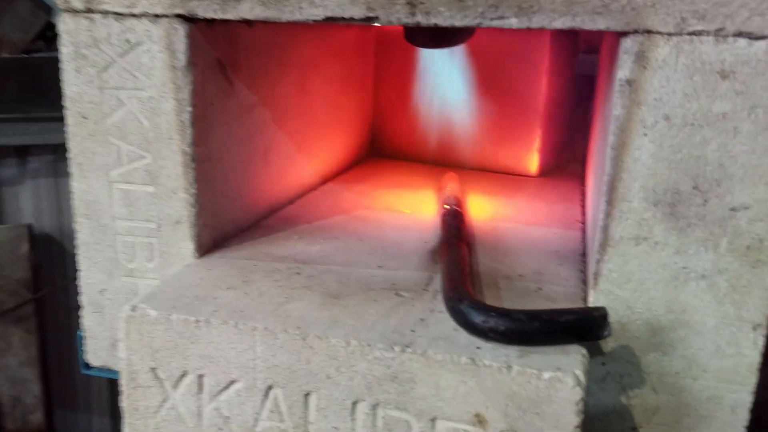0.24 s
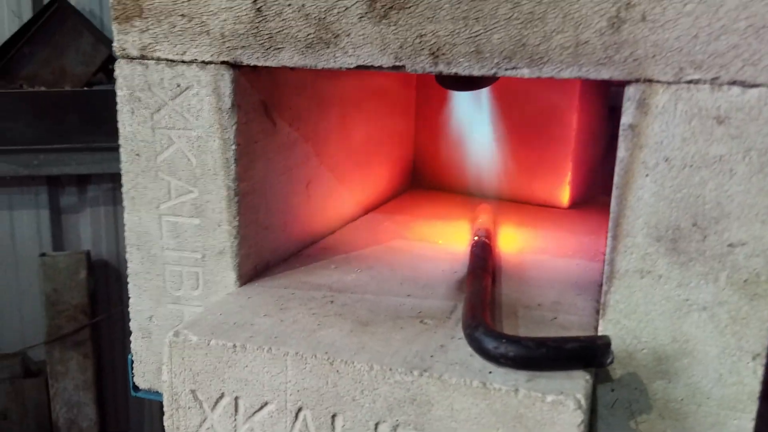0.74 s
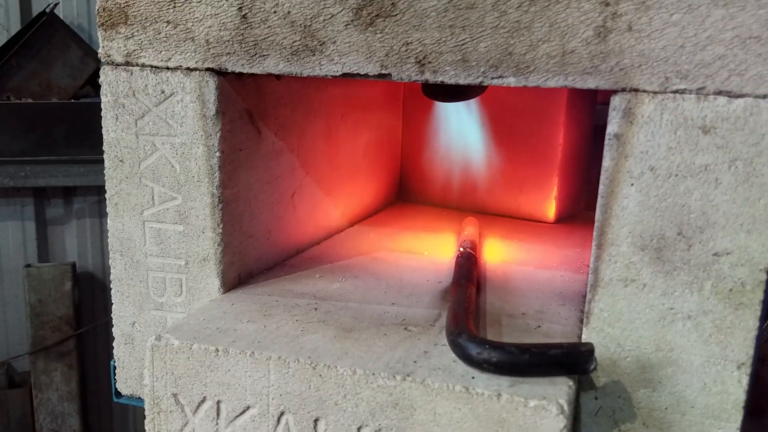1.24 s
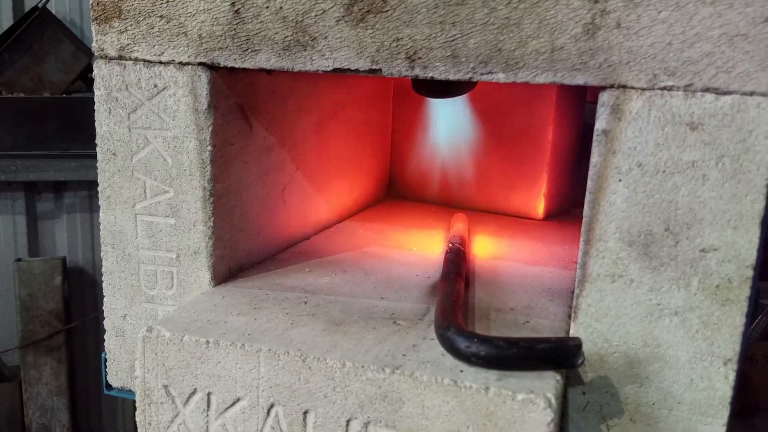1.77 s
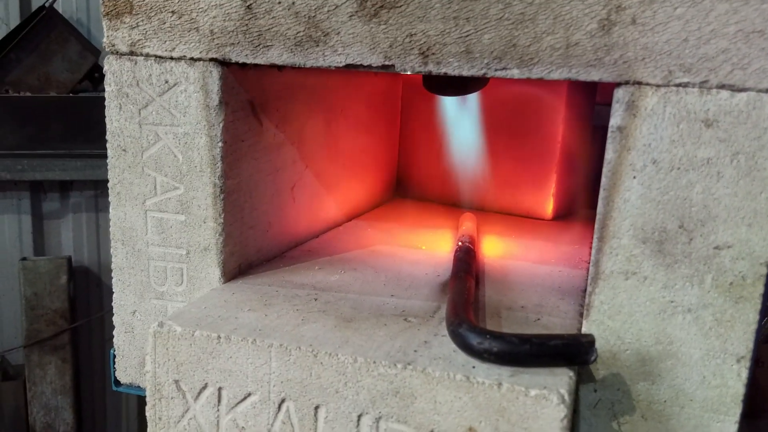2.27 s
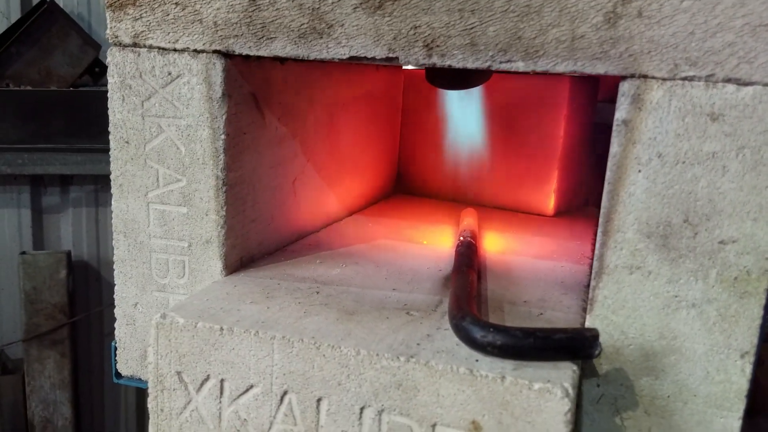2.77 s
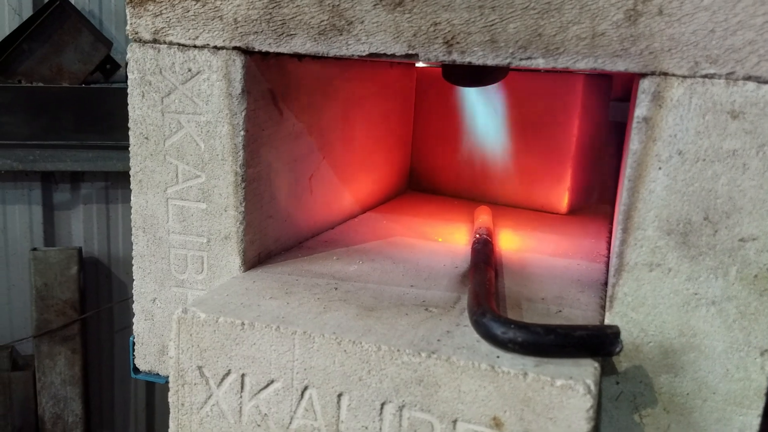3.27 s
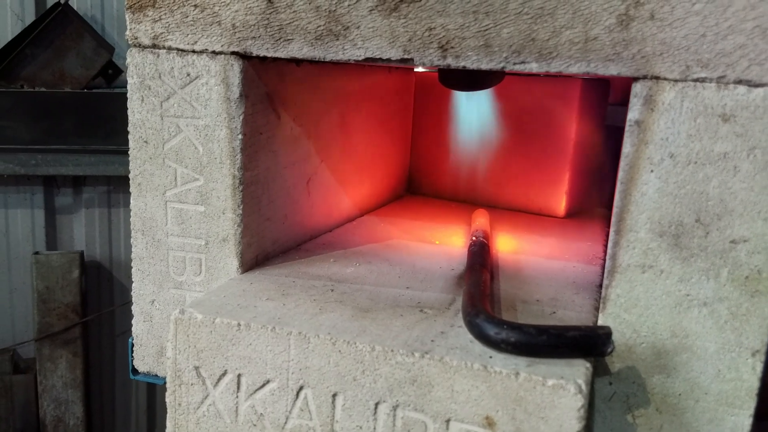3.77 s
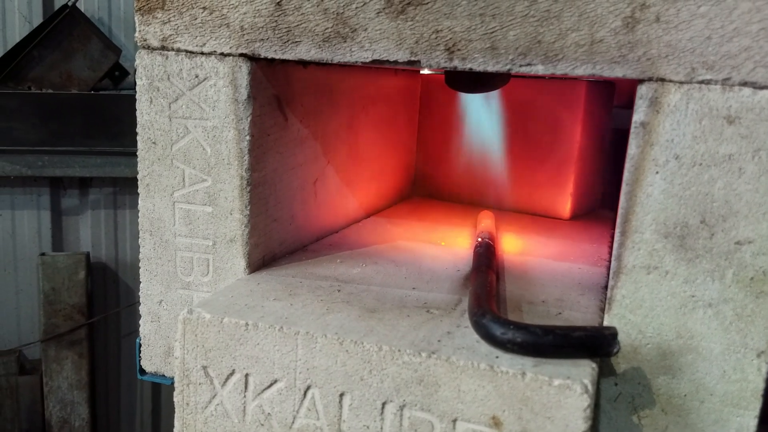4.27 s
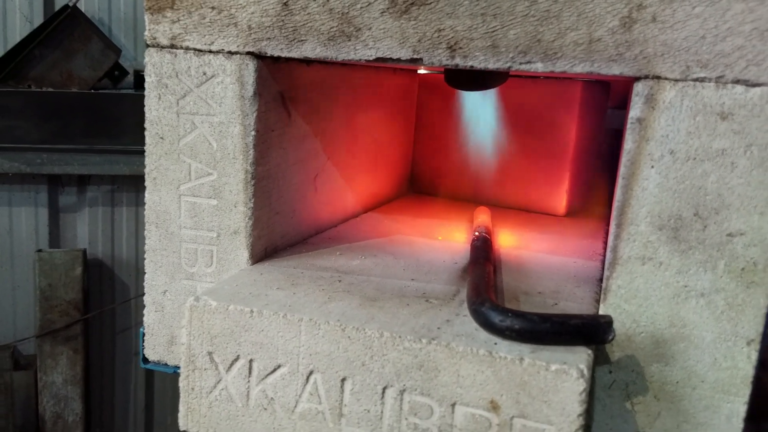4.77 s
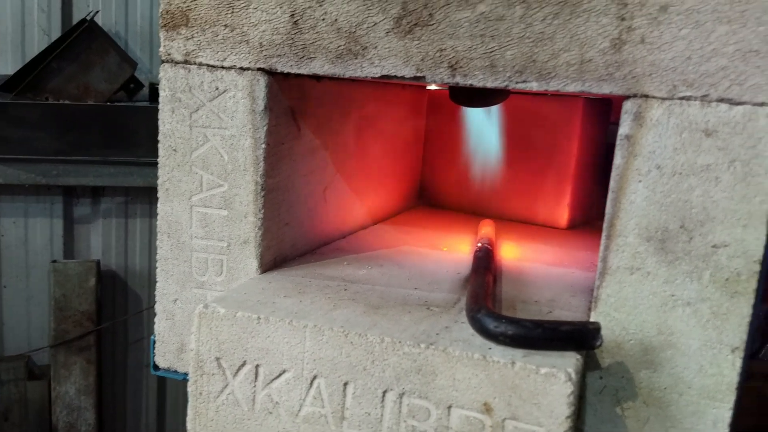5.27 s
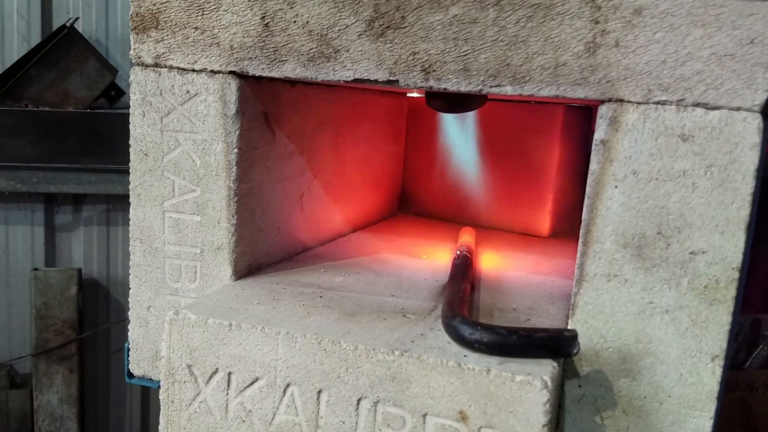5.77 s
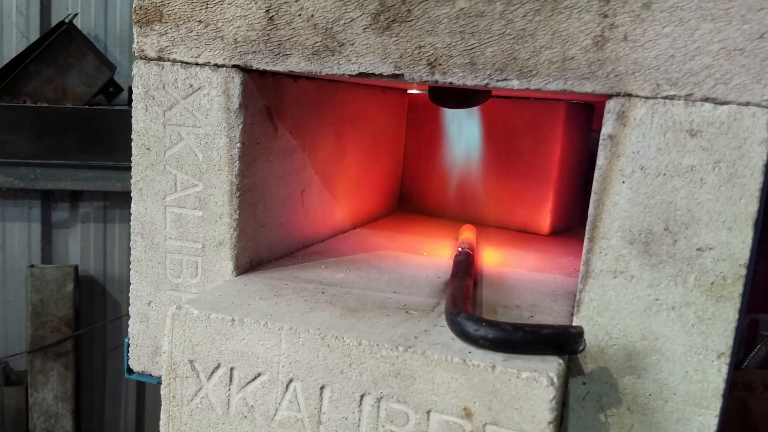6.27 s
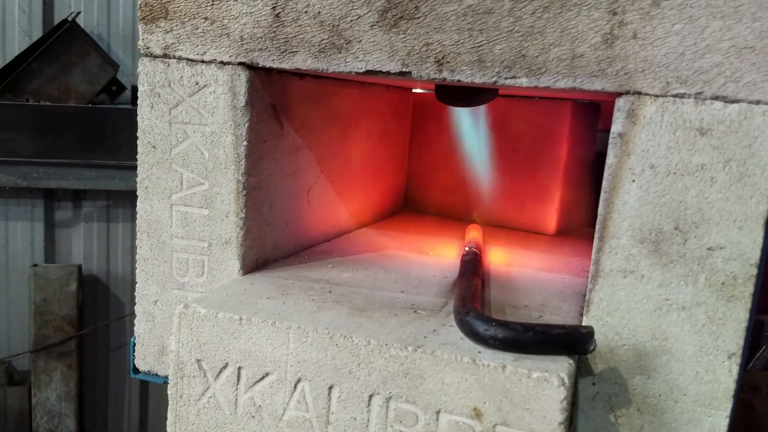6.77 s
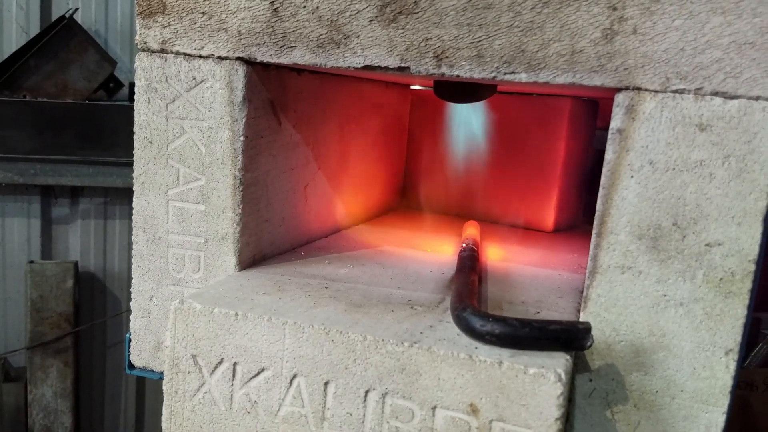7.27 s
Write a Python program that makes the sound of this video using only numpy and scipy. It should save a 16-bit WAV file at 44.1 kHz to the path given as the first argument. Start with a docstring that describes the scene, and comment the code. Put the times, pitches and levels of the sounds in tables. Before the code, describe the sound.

A propane forge burner makes a low, fluttering roar with a faint hiss, gradually getting quieter, with a few soft scuffs nearby.

```python
"""A low, fluttering roar is heard first: a turbulent propane flame driving the resonances of a small
firebrick forge. The flame front adds a soft rasp; the gas jet hisses and sings faintly in the burner
tube. All of these weaken as the gas is slowly turned down. Someone beside the forge shifts about,
making a few quiet scuffs, ticks and, near the end, stick-slip squeaks."""
import sys
import numpy as np
from scipy import signal
from scipy.fft import rfft, irfft
from scipy.io import wavfile
from scipy.ndimage import uniform_filter1d

SR = 44100
rng = np.random.default_rng(int(sys.argv[2]) if len(sys.argv) > 2 else 0)


def generate_wav(signal):
    """Clip the signal to [-1, 1] and save it as 16-bit WAV at the path in sys.argv[1]."""
    frames = np.transpose(np.atleast_2d(signal))
    scaled = np.clip(frames, -1, 1) * 32767
    pcm = np.round(scaled).astype(np.int16)
    wavfile.write(sys.argv[1], SR, pcm)


N = 331632
TIME = np.arange(N) / SR
HZ = np.maximum(np.fft.rfftfreq(N, 1 / SR), 1)

# Spectra of the noise sources. Each row: frequency in Hz, relative spectral density in dB.
RUMBLE_SPECTRUM = [(20, -43), (30, -34), (45, -16.5), (65, -9.5), (90, -3.5), (125, -4), (170, -6.5),
                   (235, -7), (285, -11.5), (325, -7), (415, -10), (440, -23), (600, -27), (900, -66.5)]
EDDY_SPECTRUM = [(150, -15), (300, -8), (420, 1), (520, 1.5), (600, -7.5), (700, -9.5), (800, -22),
                 (950, -37.5), (1400, -73)]
RASP_SPECTRUM = [(500, -3.5), (850, -5.5), (970, -7), (1100, 1.5), (1330, 2), (1850, -0.5), (2350, -9.5),
                 (3000, -18), (4800, -20), (6000, -22), (9000, -55)]
JET_SPECTRUM = [(1000, -8), (2500, -4), (4000, -6), (5700, -12), (6300, -5.5), (6950, -8.5), (7500, -6),
                (9600, -5.5), (10700, -1), (11300, -2.5), (12500, 2), (14500, 1.3), (16000, 1.5)]
SHOP_SPECTRUM = [(15, -26), (30, -17), (50, 1.5), (100, -1.5), (300, -7.5), (700, -18.5), (970, -30.5),
                 (1400, -28), (2500, -34.5), (6000, -48), (15000, -40)]
SCUFF_SPECTRUM = [(300, 8), (800, 7.5), (1300, 4.5), (2100, -0.5), (2900, -3), (4200, -10.5), (6000, -15),
                  (9000, -25), (11500, -22), (15000, -23)]
# Stereo balance. Each row: frequency in Hz, left minus right in dB.
STEREO_BALANCE = [(100, 0), (400, 0.67), (1000, -0.3), (2200, -1), (4400, -3.5), (6500, -4), (8500, -7),
                  (11000, -0.5), (14700, -7.5)]
# Stereo width. Each row: frequency in Hz, difference signal over sum signal in dB.
STEREO_WIDTH = [(40, -23), (130, -34.5), (280, -25.5), (400, -20.5), (510, -14.5), (680, -14.5), (1000, -4),
                (1700, -10), (2600, -1), (4000, 0), (8000, 1), (15000, 0.6)]
# The regulator, closed in stages. Each row: time in seconds, gas pressure as a share of full.
GAS_PRESSURE = [(0, 1), (1.1, 0.92), (2.0, 0.75), (2.7, 0.63), (3.3, 0.62), (3.8, 0.51), (5.0, 0.49),
                (5.8, 0.36), (6.8, 0.33), (7.52, 0.27)]
# Modes of the brick chamber. Each row: frequency in Hz, bandwidth in Hz, peak gain in dB,
# gain added in dB as the flame weakens by 10 dB.
CHAMBER_MODES = [(62, 54, -2, 4), (137.3, 10.6, 6.5, 1.5), (200.8, 16, 7, 0.8), (360, 22, 6.5, 1.8),
                 (392, 28, 2.5, -0.5), (467, 45, 4, 0)]
# Brief dips and swells of the rumble. Each row: centre in seconds, level change in dB.
RUMBLE_LURCHES = [(1.27, -1.5), (1.76, -4.5), (2.04, -4.5), (2.19, 2), (2.57, -2.5), (3.15, -5.5),
                  (3.27, 2.5), (4.41, -3.5), (4.53, 4.5), (4.92, -3), (5.3, -5), (6.45, -1.5)]
# Slow swing of the deepest bass. Each row: time in seconds, gain in dB.
BASS_SWING = [(0, 3), (2.1, 2.5), (2.5, -7), (3.7, -2), (4.2, 5), (4.9, -6), (5.9, -13), (6.3, 8),
              (6.95, 6), (7.5, 6)]
# Higher chamber modes, rung by small eddies. Each row: frequency in Hz, bandwidth in Hz, gain in dB.
EDDY_MODES = [(624, 18, 3.5), (872, 21, 12)]
# Brief swells of the hiss. Each row: centre in seconds, level change in dB.
JET_SPURTS = [(0.12, 3), (1.43, 2.5), (2.42, 2.5), (3.75, 1.5), (4.21, 2), (5.03, 3)]
# Modes of the burner tube. Each row: frequency in Hz, nominal bandwidth in Hz, peak level in dB,
# best pressure and pressure half-width as shares of full, added left minus right in dB.
TUBE_MODES = [(3320, 140, -67, 0.64, 0.15, 1), (3270, 150, -66, 1, 0.18, 9), (3630, 330, -67, 1, .25, -2),
              (4040, 73, -69.5, 0.94, 0.13, -6), (4380, 140, -63.5, 0.99, 0.021, 1),
              (4720, 170, -66.5, 1, 0.29, -12), (5090, 140, -69.5, 0.99, 0.28, -1),
              (9060, 300, -72.5, 0.81, 0.55, -12), (14660, 600, -64, 0.66, .25, -4)]
# Rubs of shoes and clothes. Each row: start in seconds, level in dB, length in seconds,
# spectral tilt in dB per octave, ring frequency in Hz.
SCUFF_RUBS = [(0.096, -44.5, 0.037, -1, 3300), (1.81, -41, .04, -3.5, 2900), (2.326, -51, 0.045, 1, 2900),
              (2.573, -48.5, 0.042, -0.5, 1400), (3.835, -50, 0.041, 2.5, 2400),
              (4.104, -51, 0.033, 0.5, 1410), (4.133, -48, 0.035, 1.5, 2000),
              (4.217, -52.5, 0.048, 1.5, 1500), (4.541, -44.5, 0.031, -3, 2400),
              (4.72, -55, 0.036, 0.5, 4700), (4.808, -45.5, 0.045, 2.3, 1400),
              (5.15, -43, .045, -3.5, 2900), (5.298, -51.5, 0.032, -0.5, 1300),
              (5.494, -54.5, 0.022, 0.5, 2500), (6.02, -54, 0.033, 0, 1400),
              (6.434, -51.5, 0.056, -1.5, 1400), (6.892, -44.5, 0.039, -0.6, 2630),
              (7.11, -55.5, 0.045, -.5, 2300), (7.165, -53.5, 0.069, 0, 1300),
              (7.287, -49.5, 0.038, -1, 2800), (7.356, -47.5, 0.048, -2, 1350)]
# Small cracks. Each row: start in seconds, level in dB, ring frequency in Hz, decay time in seconds.
TICK_CRACKS = [(3.838, -56, 2900, .004), (4.139, -51, 2400, .004), (4.73, -55, 4600, .003),
               (4.815, -48, 4500, .005), (4.824, -47, 3800, .002), (4.842, -46, 1450, 0.003),
               (5.266, -47, 4600, 0.00073), (6.902, -53, 2650, 0.0074)]
# Squeaking rubs. Each row: start in seconds, level in dB, length in seconds, first and last pitch in Hz.
SQUEAK_STROKES = [(7.166, -57, 0.058, 1000, 1570), (7.227, -57, 0.03, 1200, 1230),
                  (7.292, -56, 0.061, 1180, 1550), (7.362, -60.5, 0.078, 1080, 1424)]


def from_db(db):
    """Amplitude grows tenfold with every 20 decibels."""
    return 10 ** (np.asarray(db) / 20)


def unit_rms(x):
    """Normalisation to unit mean power."""
    return x / np.sqrt(np.mean(x ** 2) + 1e-20)


def over_time(rows):
    """Linear interpolation in time."""
    return np.interp(TIME, *np.transpose(rows))


def over_frequency(rows):
    """Interpolation on a logarithmic frequency axis."""
    hz, value = np.transpose(rows)
    return np.interp(np.log(HZ), np.log(hz), value)


def filtered(x, response):
    """Linear filtering multiplies the spectrum by a frequency response."""
    return irfft(rfft(x) * response, N)


def resonance(hz, width_hz):
    """Complex response of a damped oscillator, 1 at its peak."""
    return 1 / (1 + 1j * (HZ / hz - hz / HZ) * hz / width_hz)


def drift(rate_hz):
    """Low-passed noise gives a random fluctuation of unit RMS."""
    return unit_rms(filtered(rng.standard_normal(N), 1 / (1 + (HZ / rate_hz) ** 2)))


def swells(rows, half_width_s):
    """Gaussian rises and dips of level, in dB."""
    return sum(db * np.exp(-((TIME - s) / half_width_s) ** 2) for s, db in rows)


def noise(response, pan_db=0):
    """Partly coherent stereo noise of unit power: alike in the bass, unrelated in the treble."""
    mid, side = rfft(rng.standard_normal((2, N)))
    left_right = np.array([[1], [-1]])
    pair = mid + from_db(over_frequency(STEREO_WIDTH)) * side * left_right
    balance = from_db(left_right * (over_frequency(STEREO_BALANCE) + pan_db) / 2)
    return unit_rms(irfft(pair * response * balance, N))


def reflections(strength, count=14, absorbed_hz=8000):
    """Comb filtering: echoes off bench, bricks and walls interfere with the direct sound."""
    delays_s = rng.uniform(.001, .016, (2, count))
    signs = rng.choice([-1, 1], (2, count))
    paths = np.zeros((2, N))
    np.put_along_axis(paths, (delays_s * SR).astype(int), signs / np.sqrt(count), axis=1)
    # Long waves diffract round small surfaces; air damps the shortest on their way.
    reflected = strength * HZ / np.hypot(HZ, 3000) / (1 + (HZ / absorbed_hz) ** 4)
    return (1 + reflected * rfft(paths)) / np.sqrt(1 + reflected ** 2)


def rumble(halvings, reference_db=-19):
    """Forced resonance: unsteady burning drives chamber modes, most sharpening as the flame weakens."""
    flicker_db = (0.57 + 0.46 * halvings) * drift(rate_hz=9.3)
    level_db = -18.5 - 8 * halvings + flicker_db + swells(RUMBLE_LURCHES, half_width_s=0.032)
    weakening = (reference_db - uniform_filter1d(level_db, size=SR)) / 10
    drive = noise(from_db(over_frequency(RUMBLE_SPECTRUM)))
    roar = drive
    for hz, width_hz, db, added_db in CHAMBER_MODES:
        mode = filtered(drive, resonance(hz, width_hz))
        roar = roar + (from_db(db + added_db * weakening) - 1) * mode
    running_power = uniform_filter1d(np.mean(roar ** 2, axis=0), size=4000)
    return from_db(level_db) * roar / np.sqrt(running_power + 1e-9)


def heave(roar, corner_hz=62):
    """Slow amplitude modulation makes the deepest band of the roar swell and sink."""
    bass = filtered(roar, 1 / (1 + (HZ / corner_hz) ** 8))
    return roar + (from_db(over_time(BASS_SWING)) - 1) * bass


def eddies(halvings):
    """Small-scale turbulence excites the higher modes; this upper roar fades fastest with the gas."""
    modes = 1 + sum((from_db(db) - 1) * resonance(hz, width_hz) for hz, width_hz, db in EDDY_MODES)
    flutter_db = drift(rate_hz=28) + 0.8 * drift(rate_hz=110)
    level_db = -32.5 - 14.5 * halvings + flutter_db
    return from_db(level_db) * noise(from_db(over_frequency(EDDY_SPECTRUM)) * modes)


def rasp(halvings, echoes):
    """Combustion noise: the wrinkling flame front radiates a soft rasp in quick puffs."""
    puffs_db = 1.5 * drift(rate_hz=50) + 0.2 * drift(rate_hz=190)
    level_db = -47.5 - 9.5 * halvings + puffs_db
    return from_db(level_db) * noise(from_db(over_frequency(RASP_SPECTRUM)) * echoes)


def jet(halvings, echoes, top_hz=14000, top_loss_db=1.2):
    """Jet noise: gas leaves a small orifice with a thin, wavering hiss that dulls as the flow slows."""
    waver_db = drift(rate_hz=9) + 0.54 * drift(rate_hz=120) + swells(JET_SPURTS, half_width_s=0.03)
    level_db = -50.5 - 5 * halvings ** 1.32 + waver_db   # holds up at first, then falls faster
    hiss = from_db(level_db) * noise(from_db(over_frequency(JET_SPECTRUM)) * echoes)
    top = filtered(hiss, 1 / (1 + (top_hz / HZ) ** 20))
    return hiss + (from_db(-top_loss_db * halvings) - 1) * top


def burner_tube(pressure, waver_db=2.1):
    """Pipe resonance: the jet excites narrow modes, each most strongly at its own gas pressure."""
    out = 0
    for hz, width_hz, db, best_pressure, half_width, pan_db in TUBE_MODES:
        coupling = 1 / (1 + ((pressure - best_pressure) / half_width) ** 2)
        tone = noise(np.abs(resonance(hz, width_hz)) ** 2, pan_db)
        out = out + from_db(db + waver_db * drift(rate_hz=10)) * coupling * tone
    return out


def workshop(level_db=-45):
    """Stationary noise forms the dull background of the shop."""
    return from_db(level_db) * noise(from_db(over_frequency(SHOP_SPECTRUM)))


def scuffs(echoes, ring_db=5, bite_db=1, tail_db=-9, tail_decay_s=0.11, tail_hz=2600):
    """Sliding friction gives a short noise with one broad ring; reverberation leaves a duller tail."""
    spectrum = from_db(over_frequency(SCUFF_SPECTRUM)) * echoes
    direct, tails = 0, 0
    for start, db, length, tilt_db, ring_hz in SCUFF_RUBS:
        progress = (TIME - start) / length
        since_end = np.maximum(TIME - start - length, 0)
        ring = 1 + (from_db(ring_db) - 1) * resonance(ring_hz, 0.066 * ring_hz)
        attack = np.clip(progress / .13, 0, 1)
        level_db = db + bite_db * (np.clip(1 - progress, 0, 1) - 0.5)   # bites, then eases off
        rub = attack * from_db(level_db) * noise(spectrum * ring * from_db(tilt_db * np.log2(HZ)))
        contact = np.exp(-since_end / (.6 * length))
        room_fill = min(length / 0.023, 1)   # a very short rub fills the room less
        direct = direct + rub * contact
        tails = tails + rub * (1 - contact) * np.exp(-since_end / tail_decay_s) * room_fill
    return direct + from_db(tail_db) * filtered(tails, 1 / np.hypot(1, HZ / tail_hz))


def ticks(relative_bandwidth=0.27):
    """Heavy damping: each small crack has one broad resonance that decays in milliseconds."""
    out = 0
    for start, db, hz, decay_s in TICK_CRACKS:
        envelope = (TIME >= start) * np.exp(-np.abs(TIME - start) / decay_s)
        out = out + from_db(db) * envelope * noise(resonance(hz, relative_bandwidth * hz))
    return out


def squeaks(echoes, roughness_hz=80, ramp_s=.006, upper_ratio=1.36, upper_db=-8):
    """Stick-slip friction: a hoarse tone and a weaker one above it climb through each stroke."""
    out = np.zeros((2, N))
    for start, db, length, first_hz, last_hz in SQUEAK_STROKES:
        hz = np.interp(TIME, [start, start + length], [first_hz, last_hz])
        envelope = np.clip(np.minimum(TIME - start, start + length - TIME) / ramp_s, 0, 1)
        phase = 2 * np.pi * np.cumsum(hz) / SR
        tones = np.exp(1j * phase) + from_db(upper_db) * np.exp(1j * upper_ratio * phase)
        roughness = 1 + .6 * (drift(roughness_hz) + 1j * drift(roughness_hz))
        out += from_db(db) * envelope * np.real(roughness * tones)
    return filtered(out, echoes)


def scene():
    """Superposition: flame and gas, governed by the regulator, add to the shop and a person's movements."""
    pressure = over_time(GAS_PRESSURE)
    halvings = -np.log2(pressure)   # how many times the gas pressure has been halved
    burner_echoes, floor_echoes = reflections(strength=0.75), reflections(strength=1.0)
    flame = heave(rumble(halvings)) + eddies(halvings) + rasp(halvings, burner_echoes)
    gas = jet(halvings, burner_echoes) + burner_tube(pressure)
    return flame + gas + workshop() + scuffs(floor_echoes) + ticks() + squeaks(burner_echoes)


def record(dry, fade_s=0.0032, cutoff_hz=15750):
    """Band limiting: a steep low-pass cuts the highest treble, after a brief fade at each end."""
    fades = np.clip(np.minimum(TIME, TIME[-1] - TIME) / fade_s, 0, 1)
    low_pass = signal.ellip(12, .1, 80, cutoff_hz, fs=SR, output="sos")
    return signal.sosfilt(low_pass, dry * fades)


dry = scene()
out = record(dry)
generate_wav(out)
```